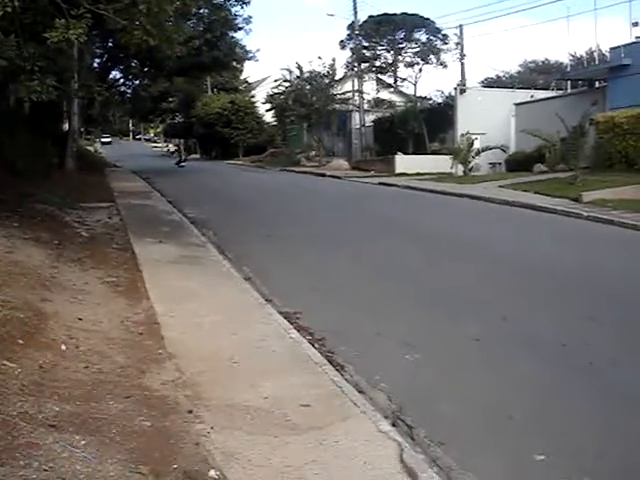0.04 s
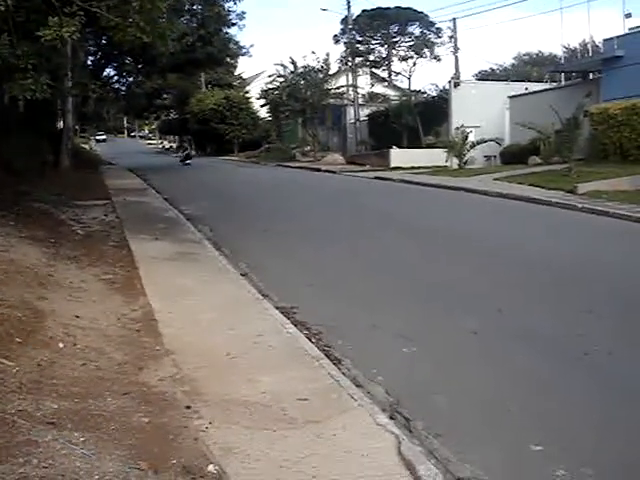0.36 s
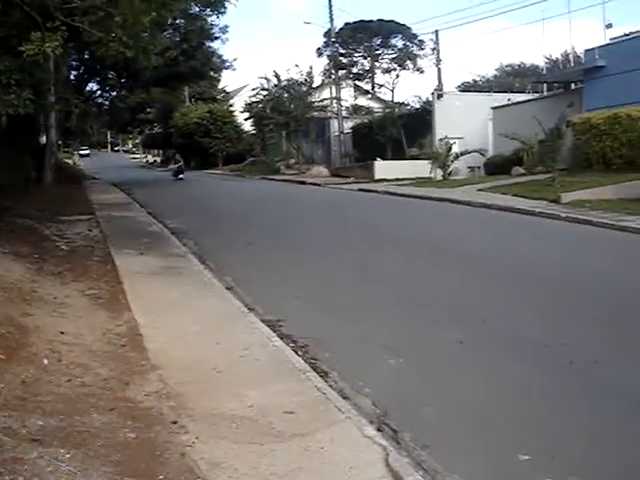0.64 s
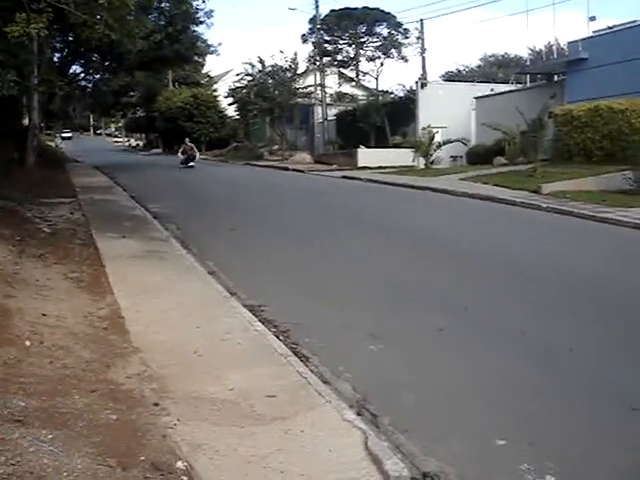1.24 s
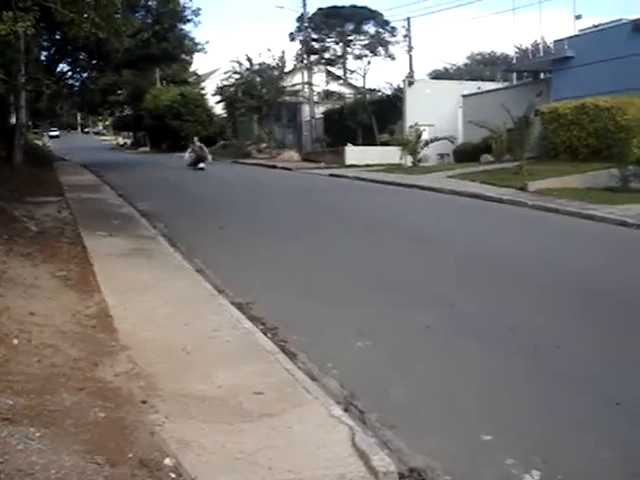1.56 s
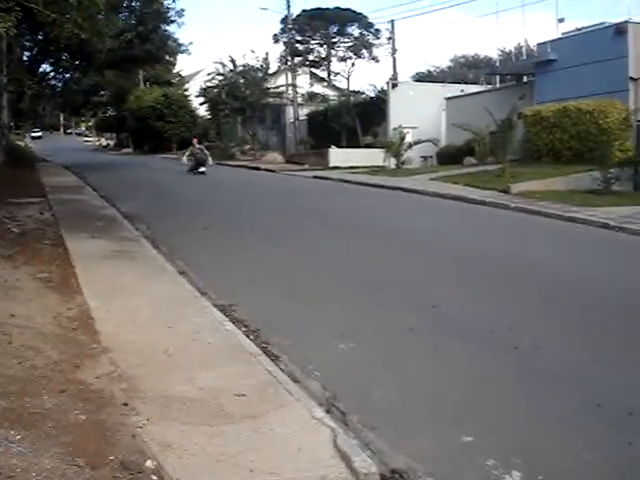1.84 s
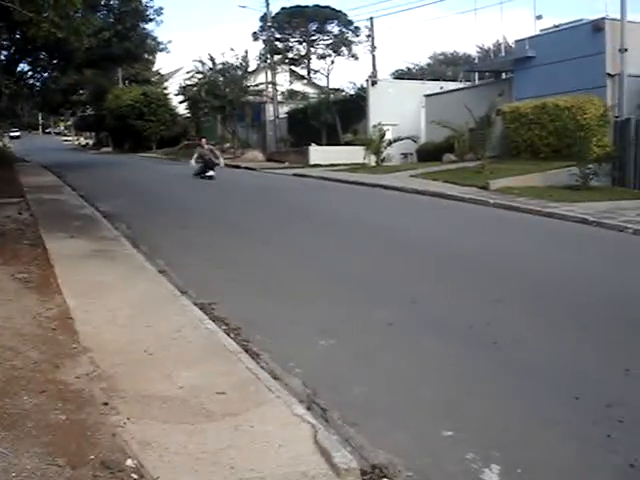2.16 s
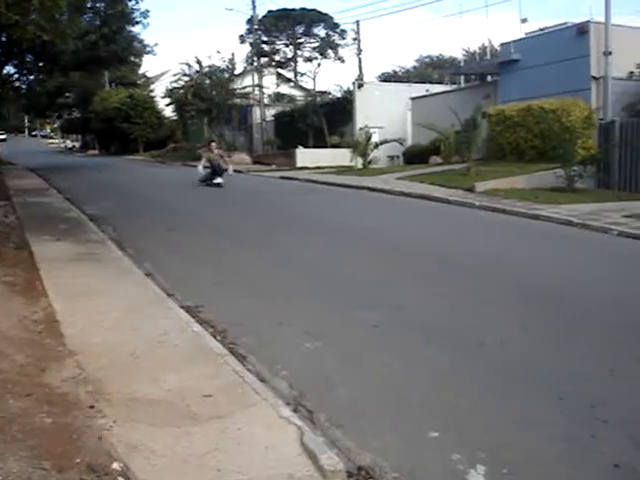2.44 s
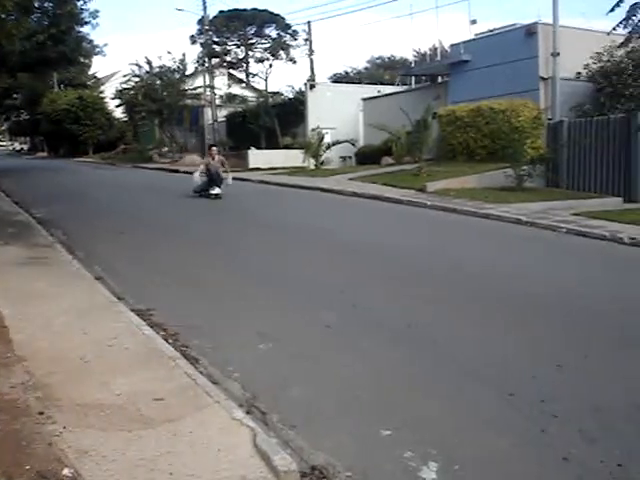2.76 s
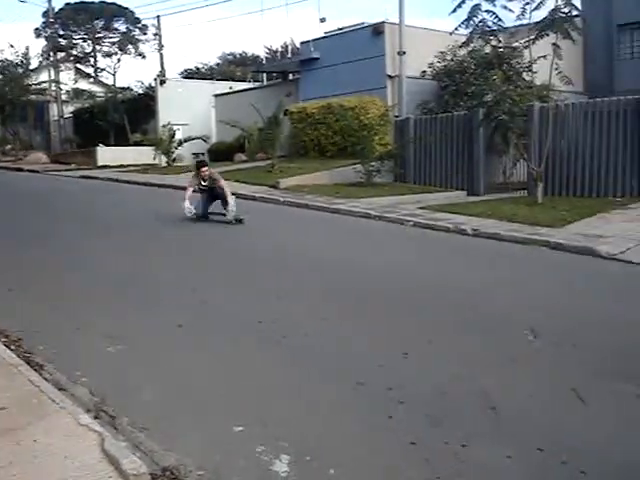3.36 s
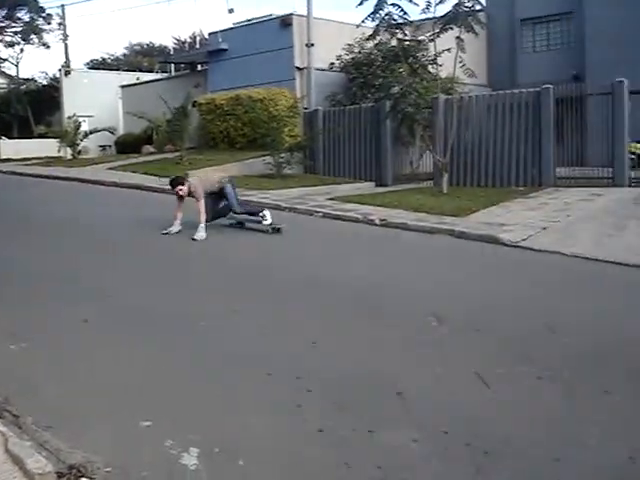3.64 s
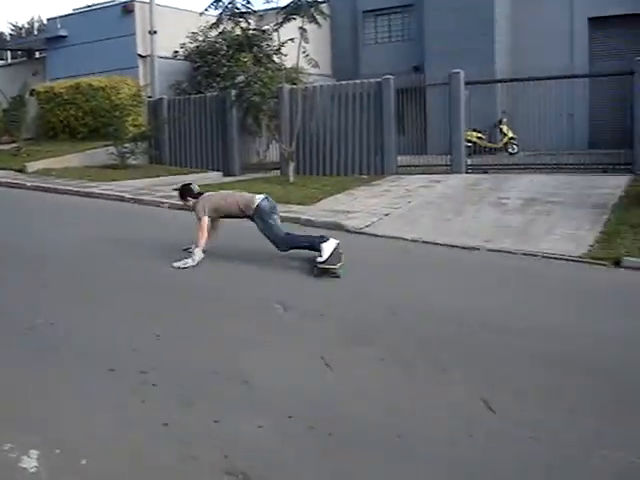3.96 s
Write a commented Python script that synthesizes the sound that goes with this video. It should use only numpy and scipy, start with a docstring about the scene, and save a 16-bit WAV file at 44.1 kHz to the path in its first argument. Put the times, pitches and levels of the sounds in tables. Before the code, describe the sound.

A longboard rolls on an asphalt street, faint at first, its gritty roar and low drone growing as it nears. From about 2.2 seconds, bumps make it knock and rattle. A skidding hiss rises after 3 seconds, and hard gloves clack on the road near 3.6. A loud sideways scrape follows until the end at 4 seconds, with brief wheel screeches and wind rumbling on the slightly overloaded microphone.

```python
"""A longboard rolls up and slides

A longboard comes closer on an asphalt street: tiny stones make it roar and crackle, the deck drones,
and bumps make it knock and rattle. The rider drops onto hard gloves and throws the board sideways,
so the wheels scrape and briefly screech. Walls and fences scatter the sound. Wind rumbles on the
microphone, which overloads a little during the slide."""
import sys
import numpy as np
from scipy import signal
from scipy.fft import rfft, irfft
from scipy.io import wavfile

SR = 44100
rng = np.random.default_rng(int(sys.argv[2]) if len(sys.argv) > 2 else 0)


def file_out(sig):
    """Save sig as 16-bit WAV at sys.argv[1]."""
    # one column per channel
    cols = np.atleast_2d(sig).T
    # limit, then scale
    lim = np.clip(cols, -1, 1)
    pcm = np.round(lim * 32767).astype(np.int16)
    wavfile.write(sys.argv[1], SR, pcm)


N = 176400  # 4 seconds

# How the rolling grows as the board nears (time [s], roar [dB], drone [dB], crackle [dB])
APPROACH = [(0, -40.5, -50, -45), (.2, -45, -46.5, -47.5), (.5, -41.5, -45.5, -45), (.68, -39.5, -44, -43),
            (.9, -39, -47, -47.5), (1.05, -44.5, -44, -45), (1.3, -36, -42.5, -44), (1.55, -38, -41.5, -41),
            (1.85, -35.5, -40.5, -40), (2.15, -30, -36, -37.5), (2.32, -30.5, -38, -35.5),
            (2.52, -26.5, -30.5, -31), (2.68, -28, -32.5, -34), (2.85, -26, -35.5, -33.5),
            (2.95, -29.5, -31, -34.5), (3.12, -25.5, -34, -31.5), (3.3, -32, -35.5, -35),
            (3.5, -28, -39, -34)]
# Tone of the wheels' roar, the deck's drone and the grit's crackle (frequency [Hz], relative level [dB])
ROAR_TONE = [(150, -36), (330, -8), (420, -5.5), (480, -2), (580, -2), (700, 0.5), (800, -3), (900, -4.5),
             (1030, -15), (1400, -34.5), (3000, -43.5)]
DRONE_TONE = [(20, -48), (80, -54.5), (115, -21), (170, -6), (225, 0), (260, 0.5), (310, -1), (400, -15.5),
              (700, -26.5), (2000, -54.5)]
GRIT_TONE = [(300, -23.5), (800, 0.5), (1050, 1.5), (1350, 0.5), (1700, 0), (1900, -2.5), (2150, -5),
             (3300, -7.5), (4800, -13.5), (6500, -19.5), (9000, -28.5), (10000, -27)]
# How hard the sideways scrape is, and the hiss of wheels losing grip (time [s], level [dB])
SCRAPE_LEVELS = [(3.45, -72), (3.53, -28.5), (3.572, -33.5), (3.59, -26), (3.625, -21), (3.665, -17.5),
                 (3.74, -17.5), (3.8, -17.5), (3.87, -17), (3.93, -18.5), (4.0, -20)]
SKID_LEVELS = [(2.9, -74), (3.25, -49), (3.45, -39), (3.55, -43.5), (3.62, -55), (3.7, -49), (3.8, -52),
               (4.0, -60)]
# Tone of that scrape and that hiss (frequency [Hz], relative level [dB])
SCRAPE_TONE = [(80, -29), (220, -19), (420, -9.5), (560, -2), (800, 3.5), (1050, -1.5), (1350, 1),
               (1800, -1), (2150, -4), (2700, -3), (3600, -8), (4800, -11.5), (6000, -20), (8000, -25),
               (10000, -32)]
SKID_TONE = [(800, -22), (2000, -3), (3300, 4.5), (4800, -2.5), (6500, -11), (10000, -20.5)]
# Wheel screeches (start [s], length [s], first pitch [Hz], last pitch [Hz], width [Hz], level [dB])
WHEEL_SQUEALS = [(3.683, .04, 3250, 2915, 750, -16), (3.675, .058, 4400, 4200, 1490, -22.5),
                 (3.711, .026, 2640, 2670, 800, -18), (3.745, .125, 900, 808, 131, -22),
                 (3.902, .12, 1805, 1900, 150, -25), (3.92, .1, 788, 790, 70, -34)]
# Gloves and board hit the road (time [s], level [dB], rise [s], decay [s])
ROAD_SLAPS = [(3.5762, -6, .0002, 0.0023), (3.584, -7.5, 0.0025, 0.0079), (3.599, -12, .001, 0.0022),
              (3.616, -18, .001, .006), (3.639, -8.5, 0.0012, 0.0025), (3.657, -8.5, 0.0006, 0.0081)]
# Tone of the slaps and of the first one's sharp crack (frequency [Hz], relative level [dB])
SLAP_TONE = [(60, -15), (300, -10), (650, 3.5), (1000, 3), (1500, -1.5), (2000, -3), (3000, -8.5),
             (5000, -32.5), (10000, -43)]
CRACK_TONE = [(500, -14), (2500, 7), (5000, -11), (10000, -15)]
# Bumps in the road (time [s], knock level [dB], rattle boost [dB])
ROAD_BUMPS = [(0.495, -26, -16), (1.527, -20, -21), (1.548, -19, -18), (2.234, -24, 4.5), (2.265, -20, -6),
              (2.347, -19, -10), (2.501, -16, -13), (2.598, -22, -2.5), (2.636, -21, 1.5), (2.714, -16, -2),
              (2.757, -22, -4), (2.838, -20, 3), (2.850, -17, -8), (2.996, -16.5, -12), (3.027, -12.5, -7),
              (3.108, -15.5, -15), (3.119, -16, -7)]
# Notes of the knocked board (pitch [Hz], relative level [dB], time to fade by 60 dB [s])
BOARD_NOTES = [(241, -22.5, 0.054), (275, -21, .06), (470, -49, .04), (640, 18.5, 0.025), (786, 7, .03),
               (830, 18, 0.035), (1080, -5.5, .015)]
# Tone of the rattling trucks, the metal axle mounts (frequency [Hz], relative level [dB])
RATTLE_TONE = [(250, -37), (700, 1), (1150, 3.5), (1400, -2.5), (1800, 4.5), (2300, -10.5), (3300, -12),
               (5000, -20.5), (10000, -32)]
# Wheels and deck sing as the board turns (start [s], length [s], pitch [Hz], level [dB])
TURN_HUMS = [(0.698, 0.43, 729, -42), (.85, 0.54, 476, -44.5), (1.449, .55, 670, -41.5),
             (2.217, .1, 265, -32.5), (3.052, 0.35, 741, -29), (3.207, 0.091, 261, -29.5)]
# Wind on the microphone (time [s], level [dB])
WIND_LEVELS = [(3.5, -75), (3.56, -58), (3.585, -39), (3.62, -52), (3.68, -41), (3.77, -35), (3.83, -45),
               (3.89, -49), (4.0, -60)]
# A hand brushes the camera (time [s], level [dB], length [s])
HAND_SCUFFS = [(0.424, -37, 0.014), (0.458, -28, .011)]
# Tone of the wind, the scuffs and the street's background (frequency [Hz], relative level [dB])
WIND_TONE = [(10, -5), (35, -6), (60, -12), (120, -15), (300, -25), (1000, -64)]
SCUFF_TONE = [(300, -20), (1000, -10), (1450, 12), (2100, -20), (4000, -1), (6000, -15), (8000, -11),
              (10000, -2.5)]
AIR_TONE = [(20, -8.5), (100, 4.5), (300, -4), (1000, -3), (2200, -4.5), (4000, -3), (6500, -9.5),
            (10000, -16)]

T = np.arange(N) / SR  # time of each sample [s]


def rolling():
    """Stones in the asphalt make the wheels roar and the grit crackle, over the deck's low drone."""
    fade_db_per_s = 12.5  # the rolling dies away once the board is sideways
    fade = amp(-fade_db_per_s * np.maximum(T - APPROACH[-1][0], 0))
    stones = grains(per_s=1800, spread_db=3.5, share=0.49)
    road = unit(stones * amp(wander(hz=21)))  # the uneven road jolts the level by about 1 dB
    roar = amp(-1) * level(APPROACH, column=1) * unit(colour(road, ROAR_TONE))
    drone = amp(-1.5) * level(APPROACH, column=2) * unit(colour(rng.standard_normal(N), DRONE_TONE))
    crackle = road * rng.choice([-1., 1.], N)
    grit = level(APPROACH, column=3) * unit(colour(crackle, GRIT_TONE))
    return fade * (roar + drone + grit)


def slide():
    """Wheels and gloves stick and slip over the grit: first a hiss, then the full scrape."""
    slips = grains(per_s=3500, spread_db=3, share=0.41)
    chatter = amp(1.5 * wander(hz=120))
    scrape = unit(slips * chatter) * level(SCRAPE_LEVELS) * (T > SCRAPE_LEVELS[0][0])
    hiss = rng.standard_normal(N) * level(SKID_LEVELS)
    return colour(hiss, SKID_TONE) + colour(scrape, SCRAPE_TONE)


def squeals():
    """Now and then the slipping locks onto one of a wheel's own notes, and it screeches."""
    out, edge_s = np.zeros(N), 0.017
    for start, length, hz, end_hz, width_hz, db in WHEEL_SQUEALS:
        t = np.arange(0, length, 1 / SR)
        shape = np.clip(np.minimum(t, length - t) / edge_s, 0, 1)
        pitch = hz + (end_hz - hz) * t / length
        add(out, start, amp(db) * shape * fuzzy_tone(pitch, width_hz))
    return out


def slaps():
    """Hard gloves and the board clack onto the asphalt; the first touch adds a sharp crack."""
    clacks, crack, t = np.zeros(N), np.zeros(N), T[:SR // 8]
    for start, db, rise, decay in ROAD_SLAPS:
        shape = np.minimum(t / rise, 1) * np.exp(-np.maximum(t - rise, 0) / decay)
        add(clacks, start, amp(db) * shape * rng.standard_normal(len(t)))
    add(crack, ROAD_SLAPS[0][0], amp(-10.5) * np.exp(-t / .0005) * rng.standard_normal(len(t)))
    return colour(clacks, SLAP_TONE) + colour(crack, CRACK_TONE)


def bumps():
    """Each bump rings the board, a little differently each time, and rattles the trucks."""
    knocks, rattles, t = np.zeros(N), np.zeros(N), T[:SR // 8]
    rattle_peak_s = 0.0037
    rattle_shape = (t / rattle_peak_s) * np.exp(1 - t / rattle_peak_s)
    for start, db, boost_db in ROAD_BUMPS:
        ring = sum(amp(note_db - 60 * t / fade_s) * np.sin(2 * np.pi * hz * rng.uniform(.94, 1.06) * t)
                   for hz, note_db, fade_s in BOARD_NOTES)
        add(knocks, start, amp(db) * ring / abs(ring).max())
        add(rattles, start, amp(db + boost_db - 6) * rattle_shape * rng.standard_normal(len(t)))
    bass_cut = signal.butter(3, 170, "high", fs=SR, output="sos")
    return signal.sosfilt(bass_cut, knocks) + colour(rattles, RATTLE_TONE)


def hums():
    """Single notes of the wheels and deck swell and fade."""
    out = np.zeros(N)
    for start, length, hz, db in TURN_HUMS:
        t = np.arange(0, length, 1 / SR)
        swell = np.sin(np.pi * t / length)
        add(out, start, amp(db) * swell * fuzzy_tone(np.full(len(t), hz), width_hz=81))
    return out


def pebble():
    """A pebble pings off a wheel: one small, bright tick."""
    out, t = np.zeros(N), T[:SR // 8]
    ping = fuzzy_tone(hz=np.full(len(t), 4300), width_hz=1200)
    add(out, start_s=2.395, sound=amp(-31.5) * np.exp(-t / .006) * ping)
    return out


def street_echoes(sound):
    """Walls and fences throw back a thin scatter of quiet echoes."""
    t = T[:SR // 2]
    echoes_per_s, fade_s = 2000, 0.27
    echoes = rng.standard_normal(len(t)) * (rng.random(len(t)) < echoes_per_s / SR)
    echoes *= (t > .01) * amp(-60 * t / fade_s)
    return amp(-9.5) * signal.oaconvolve(sound, echoes / np.linalg.norm(echoes))[:N]


def scuffs():
    """A hand brushes the camera twice, making short puffs of noise."""
    out = np.zeros(N)
    for start, db, length in HAND_SCUFFS:
        swell = np.hanning(round(length * SR))
        add(out, start, amp(db) * swell * rng.standard_normal(N)[:len(swell)])
    return colour(out, SCUFF_TONE)


def wind():
    """Gusts rumble on the microphone during the slide."""
    return level(WIND_LEVELS) * unit(colour(rng.standard_normal(N), WIND_TONE))


def background():
    """Steady street noise and hiss, with a faint high whine."""
    air = amp(-51.5) * colour(rng.standard_normal(N), AIR_TONE)
    whine = amp(-67) * fuzzy_tone(hz=np.full(N, 7670), width_hz=130)
    return air + whine


def grains(per_s, spread_db, share):
    """Tiny impacts of uneven size carry `share` of the power; the rest is a blur of smaller ones."""
    clicks = (rng.random(N) < per_s / SR) * rng.choice([-1., 1.], N)
    sizes = amp(spread_db * np.minimum(rng.exponential(1, N), 3))
    return np.sqrt(share) * unit(clicks * sizes) + np.sqrt(1 - share) * rng.standard_normal(N)


def fuzzy_tone(hz, width_hz):
    """A rough note: a narrow band of noise that follows a pitch curve."""
    noise = rng.standard_normal((2, N))
    smoothing = signal.butter(2, width_hz / 2, fs=SR, output="sos")
    flutter = signal.sosfilt(smoothing, noise[0] + 1j * noise[1])[-len(hz):]
    return unit((flutter * np.exp(2j * np.pi * np.cumsum(hz) / SR)).real)


def wander(hz):
    """A smooth random wobble, strongest near the given rate."""
    f = np.fft.rfftfreq(N, 1 / SR)
    weights = (f / hz) / (1 + (f / hz) ** 4) / np.sqrt(f + 2)
    return unit(irfft(rfft(rng.standard_normal(N)) * weights, N))


def colour(sound, tone, size=4096):
    """Filters a sound with a tone table; white noise keeps its level."""
    hz, db = np.transpose(tone)
    f = abs(np.fft.fftfreq(size, 1 / SR))
    log_gain = np.log(amp(np.interp(np.log(f + 1), np.log(hz), db)))
    response = np.exp(np.conj(signal.hilbert(log_gain)))  # rings after a hit, never before it
    kernel = np.fft.ifft(response).real[:size // 2]
    return signal.oaconvolve(sound, kernel / np.linalg.norm(kernel))[:len(sound)]


def level(rows, column=1):
    """Turns one dB column of a table into a gain over time."""
    rows = np.array(rows)
    return amp(np.interp(T, rows[:, 0], rows[:, column]))


def amp(db):
    """Turns decibels into a gain."""
    return 10 ** (np.asarray(db) / 20)


def unit(sound):
    """Scales a sound to an average power of 1."""
    return sound / np.sqrt(np.mean(sound ** 2) + 1e-20)


def add(mix, start_s, sound):
    """Mixes a sound in at the given time."""
    part = mix[round(start_s * SR):][:len(sound)]
    part += sound[:len(part)]


def scene():
    """The board and its echoes, heard from the kerb in one channel."""
    board = rolling() + hums() + bumps() + pebble() + slaps() + slide() + squeals()
    return (board + street_echoes(board) + scuffs() + wind() + background())[None]


def record(dry):
    """The microphone squashes loud peaks, upward ones more; then the highest treble is cut."""
    ceiling = np.where(dry > 0, .5, .85)
    squashed = dry / (1 + (dry / ceiling) ** 4) ** (1 / 4)
    treble_cut = signal.firwin(1023, cutoff=10080, window=("kaiser", 9), fs=SR)
    return signal.oaconvolve(squashed, treble_cut[None], "same")


dry = scene()
out = record(dry)
file_out(out)
```